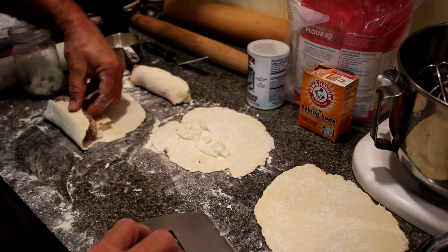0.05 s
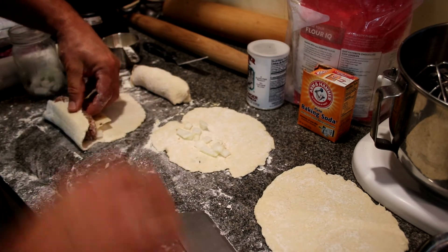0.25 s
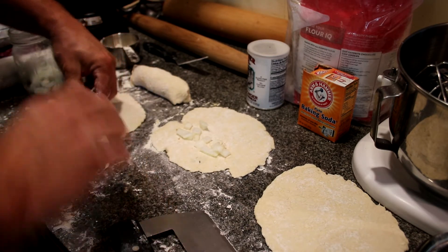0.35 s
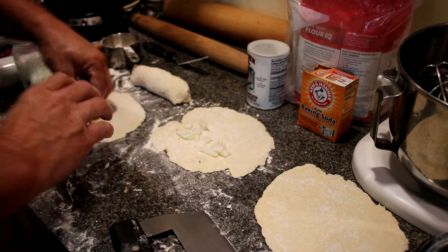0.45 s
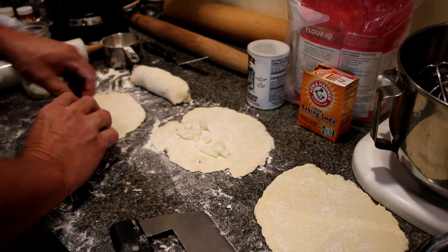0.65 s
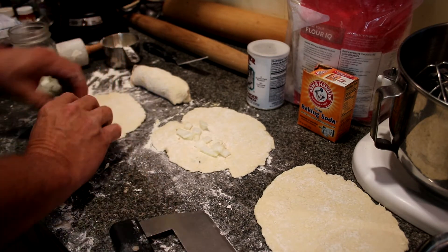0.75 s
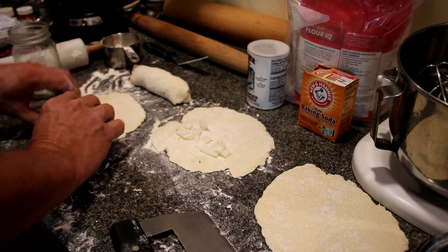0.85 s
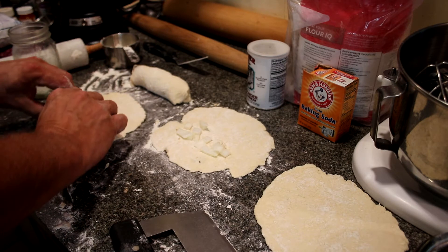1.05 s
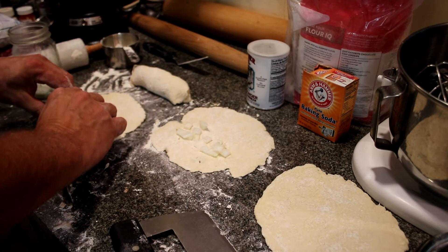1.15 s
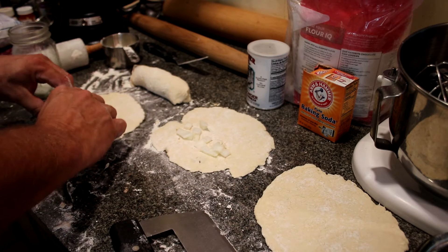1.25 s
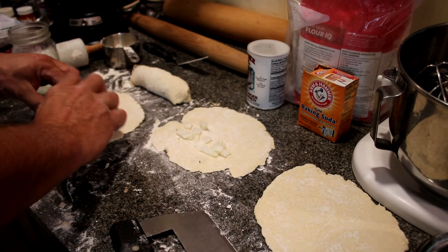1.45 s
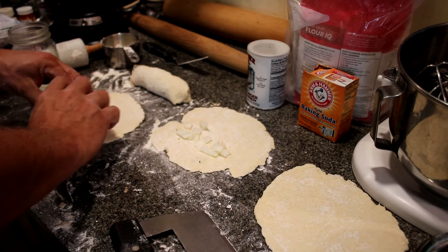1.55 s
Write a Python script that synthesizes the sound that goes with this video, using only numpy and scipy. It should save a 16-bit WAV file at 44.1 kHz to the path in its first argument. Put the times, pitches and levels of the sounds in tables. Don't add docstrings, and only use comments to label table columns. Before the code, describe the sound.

A steel dough scraper scrapes for an instant, clacks sharply onto a stone worktop and buzzes still; then faint sleeve hiss and soft floury finger brushes in a quiet, humming kitchen, close stereo microphone.

```python
import sys
import numpy as np
from scipy import signal
from scipy.fft import rfft, irfft
from scipy.io import wavfile
from scipy.ndimage import uniform_filter1d

SR = 44100
rng = np.random.default_rng(int(sys.argv[2]) if len(sys.argv) > 2 else 0)


def attenuation_scalar(level_db):
    decades = np.asarray(level_db, float) / 20
    return 10 ** decades


def generate_wav(sig):
    pcm = np.round(np.clip(np.atleast_2d(sig).T, -1, 1) * 32767).astype(np.int16)
    wavfile.write(sys.argv[1], SR, pcm)


N = 70560

# frequency in Hz, width in Hz, level in dB.
SLIDE_MODES = [(1050, 40, -8), (1285, 25, 0), (1800, 30, -5), (2260, 30, -8), (2755, 28, 0), (3190, 25, -1),
               (3400, 30, -4), (3670, 28, -6), (5610, 40, -12), (7000, 35, -5), (7600, 50, -10),
               (9090, 45, -7), (9990, 50, -10), (13200, 80, -10)]
# time in seconds, level in dB.
SLIDE_PRESSURE = [
    (0, -34),
    (.011, -31),
    (.035, -34),
    (.052, -29),
    (.064, -34),
    (.072, -38),
    (.09, -60),
]
# frequency in Hz, level in dB.
RASP_COLOUR = [(300, -34.5), (1200, -8.5), (3000, -6.5), (5000, -12.5), (7500, -8.5), (10500, -12),
               (14000, -15.5), (15800, -25.5)]
# start in seconds, level in dB, frequency in Hz.
TIPS = [
    (.0740, -20, 1150),
    (.0756, -18, 1100),
    (.0770, -10, 950),
    (.0794, -17, 1100),
]
# start in seconds, level in dB, push duration in ms.
HITS = [
    (.0804, -3.5, .12),
    (0.0814, -7.5, .04),
    (.0841, -4.5, .03),
    (0.085, -29.5, .05),
    (0.088, -21, 0.047),
    (0.098, -16.5, 0.095),
    (0.1044, -21.5, .25),
    (0.114, -36, 0.058),
]
# frequency in Hz, level in dB, T60 in seconds.
BLADE_MODES = [(1140, -13, .12), (1275, -15, .1), (1440, -16, .04), (1807, -12, .04), (2676, -7, .1),
               (3166, -7, .07), (3408, -3, .13), (3494, -5, .1), (4040, -7, .09), (7117, -9, .06),
               (8274, -10, .05), (8950, -7, .05), (9733, -5, .05), (10940, -9, .05)]
# frequency in Hz, level in dB, T60 in seconds.
SLAB_MODES = [(285, -1, .25), (600, -9, .03), (790, -7, .035), (1450, 15, .009), (1950, 2, .015)]
# frequency in Hz, level in dB.
CRACK_COLOUR = [(300, -23.5), (1300, -3.5), (2300, -10), (3500, -7.5), (5500, -10.5), (9300, -3.5),
                (13000, -12), (15800, -21.5)]
# frequency in Hz, level in dB.
CHATTER_COLOUR = [(180, -44.5), (300, -4), (553, -20), (1220, -2), (2490, -18.5), (3360, -4), (5160, -20.5),
                  (9990, -7.5), (15600, -25)]
# frequency in Hz, left minus right in dB.
SCRAPER_PAN = [(300, -0.5), (2500, -6.5), (8000, -3), (14000, -8)]
# centre in Hz, width in octaves, level in dB.
SLEEVE_BANDS = [(6500, 0.22, -55.5), (10000, 0.19, -73), (4280, 0.048, -63)]
# start in seconds, rise in seconds, fall T60 in seconds, level in dB, centre in Hz.
BRUSHES = [
    (0.489, .085, 0.197, -54, 5000),
    (.98, .03, 0.13, -67, 9000),
    (1.183, .003, 0.17, -54.5, 8200),
    (1.19, .03, .3, -58, 5400),
    (1.2855, 0.0017, .3, -47, 7460),
    (1.303, .025, 0.18, -45, 5000),
    (1.46, .035, .2, -56, 6500),
    (1.596, 0.0028, 0.1065, -43.5, 6000),
]
# frequency in Hz, level in dB.
AIR_COLOUR = [(30, -10), (300, -9), (850, -11), (2030, -18.5), (3800, -24), (5000, -31.5), (6800, -24.5),
              (15600, -27)]
# frequency in Hz, width in Hz, level in dB.
DRONE = [(52, 7, -73), (153.1, 21, -61), (262, 20, -67.5), (353.5, 15, -62), (466, 60, -61)]
# frequency in Hz, left-right correlation.
ALIKE = [(60, 0.74), (130, 0.79), (290, 0.74), (640, 0.54), (1410, 0.3), (3100, -0.65), (6820, -0.25),
         (15000, -0.044)]
# frequency in Hz, T60 in seconds, level in dB.
ROOM = [(300, 0.91, -18.5), (700, 0.9, -17), (1300, 0.88, -15.5), (2260, 0.57, -12), (3400, 0.33, -13.5),
        (5000, 0.51, -13), (8100, 0.84, -16), (14000, 0.63, -21)]

GRIT_PER_S, GRIT_SPREAD_DB, SLIDE_SHARPNESS = 6000, 1.5, 2.6
RASP_DB, LIFT_S = -4, .069
TIP_T60_S = .012
RING_DB, SLAB_DB, CRACK_DB, CRACK_T60_S = -14, -19, -1.5, .012
CHATTER_DB, CHATTER_GRAIN_DB, CHATTER_T60_S = -14, 2.5, .105
CHATTER_END_S, SETTLE_S = .13, .018
LAG_MS, THIN_HZ = 0.023, 258.2
SLEEVE_S, SLEEVE_RISE_S, SLEEVE_T60_S = 0.14, 0.22, 0.5
BRUSH_OCTAVES, BRUSH_TOP_HZ, BRUSH_GRAIN_DB = 0.96, 11070, 1.5
BRUSH_WET_DB, BRUSH_PAN_DB = -12.5, -4
DIP_HZ, DIP_DB = 5000, -3.5
CREAK_S, CREAK_LEN_S, CREAK_HZ, CREAK_DB = 0.81, 0.166, 1710, -67.5
AIR_DB, HUM_HZ, HUM_DB = -50.5, 59.3, -61
CEILING = 1.45

T = np.arange(N) / SR
F = np.maximum(np.fft.rfftfreq(2 * N, 1 / SR), 1)
Z = np.exp(-2j * np.pi * F / SR)


def table(rows, col=1):
    rows = np.array(rows, float)
    return np.interp(np.log(F), np.log(rows[:, 0]), rows[:, col])


def shape(x, gain):
    return irfft(rfft(x, 2 * N) * gain, 2 * N)[..., :N]


def unit(x):
    return x / np.sqrt(np.mean(x ** 2))


def ring(hz, t60):
    p = np.exp(2j * np.pi * hz / SR - np.log(1000) / (t60 * SR))
    return p.imag * Z / (1 - 2 * p.real * Z + abs(p) ** 2 * Z ** 2)


def hump(hz, octaves):
    return np.exp(-.5 * (np.log2(F / hz) / octaves) ** 2)


def walk(rate):
    k = max(int(SR / rate), 1)
    return unit(uniform_filter1d(uniform_filter1d(rng.standard_normal(N), k), k))


def decay(start, t60):
    return (T >= start) * attenuation_scalar(-60 * np.maximum(T - start, 0) / t60)


def stereo_noise(gain, least=0.):
    c = np.clip(np.maximum(table(ALIKE), least), 0, .99)
    mid = shape(rng.standard_normal(N), gain * np.sqrt(1 + c))
    side = shape(rng.standard_normal(N), gain * np.sqrt(1 - c))
    return unit(np.array([mid + side, mid - side]))


def slide():
    ticks = rng.random(2 * N) < GRIT_PER_S / SR
    grit = ticks * rng.standard_normal(2 * N) * attenuation_scalar(GRIT_SPREAD_DB * rng.exponential(size=2 * N))
    body = sum(attenuation_scalar(db) * ring(hz, SLIDE_SHARPNESS / width) * np.sqrt(width / 30)
               for hz, width, db in SLIDE_MODES)
    rasp = attenuation_scalar(RASP_DB) * unit(shape(grit, attenuation_scalar(table(RASP_COLOUR))))
    contact = np.clip((LIFT_S - T) / 0.0035 + 1, .15, 1)
    s, db = np.array(SLIDE_PRESSURE).T
    return (unit(shape(grit, body)) + rasp * contact) * attenuation_scalar(np.interp(T, s, db, right=-200))


def kitchen():
    air = 0
    for hz in 40 * 2. ** np.arange(9):
        gain = attenuation_scalar(table(AIR_COLOUR)) * hump(hz, 0.62)
        air = air + np.sqrt(np.mean(gain ** 2)) * stereo_noise(gain) * attenuation_scalar(1.0 * walk(5))
    drone = sum(attenuation_scalar(db) * stereo_noise(np.exp(-.5 * ((F - hz) / width) ** 2)) for hz, width, db in DRONE)
    return attenuation_scalar(AIR_DB - 3.0) * unit(air) + drone


def hum():
    return attenuation_scalar(HUM_DB + 2.0 * walk(17)) * np.sin(2 * np.pi * HUM_HZ * T)


def echo(x):
    tail = 0
    room_hz, room_t60, room_db = np.array(ROOM).T
    for hz in 150 * 2 ** np.arange(0, 6.8, 1 / 2):
        t60 = np.interp(np.log(hz), np.log(room_hz), room_t60)
        db = np.interp(np.log(hz), np.log(room_hz), room_db)
        gain = hump(hz, .25)
        level = np.sqrt(np.mean(gain ** 2) / (t60 * SR / 14))
        tail = tail + stereo_noise(gain) * level * decay(.006, t60) * attenuation_scalar(db)
    return shape(x, rfft(tail, 2 * N))


def clack():
    out = sum(attenuation_scalar(db) * decay(s, TIP_T60_S) * np.sin(2 * np.pi * hz * (T - s)) for s, db, hz in TIPS)
    noise = unit(shape(rng.standard_normal(N), attenuation_scalar(table(CRACK_COLOUR))))
    slab = sum(attenuation_scalar(SLAB_DB + db) * ring(hz, t60) for hz, db, t60 in SLAB_MODES)
    chance = rng.standard_normal((len(HITS), len(BLADE_MODES), 2))
    for (s, db, push_ms), draws in zip(HITS, chance):
        push = attenuation_scalar(db) * np.exp(-2j * np.pi * F * s) / (1 + 1j * F * push_ms / 1000)
        push = push / (1 + (F / 17000) ** 8)
        body = sum(np.sign(u) * attenuation_scalar(RING_DB + mode_db + 0.83 * v) * ring(hz * (1 + 0.0036 * v), t60)
                   for (hz, mode_db, t60), (u, v) in zip(BLADE_MODES, draws))
        if s == HITS[0][0]:
            body = body + slab
        crack = attenuation_scalar(db + CRACK_DB) * noise * decay(s, CRACK_T60_S)
        out = out + irfft(push * body, 2 * N)[:N] + crack
    return out * attenuation_scalar(-10 * np.clip((T - CHATTER_END_S) / SETTLE_S + 1, 0, 1))


def chatter():
    env = decay(HITS[1][0], CHATTER_T60_S) * np.clip((CHATTER_END_S - T) / SETTLE_S, 0, 1)
    level = attenuation_scalar(CHATTER_DB + CHATTER_GRAIN_DB * walk(500))
    return level * env * stereo_noise(attenuation_scalar(table(CHATTER_COLOUR)), 0.95)


def sleeve():
    fall = attenuation_scalar(-60 * np.maximum(T - SLEEVE_S - SLEEVE_RISE_S, 0) / SLEEVE_T60_S)
    env = np.clip((T - SLEEVE_S) / 0.017, 0, 1) * fall
    return env * sum(attenuation_scalar(db + 1.8 * walk(30)) * stereo_noise(hump(hz, octaves), 0.24)
                     for hz, octaves, db in SLEEVE_BANDS)


def fingers():
    out = 0
    dip = attenuation_scalar(DIP_DB * hump(DIP_HZ, 0.124))
    for s, rise, t60, db, hz in BRUSHES:
        env = np.clip((T - s) / rise, 0, 1) * attenuation_scalar(-60 * np.maximum(T - s - rise, 0) / t60)
        grain = rng.standard_normal(N) * attenuation_scalar(BRUSH_GRAIN_DB * walk(330))
        colour = hump(hz, BRUSH_OCTAVES) / (1 + (F / BRUSH_TOP_HZ) ** 6) * dip
        out = out + attenuation_scalar(db) * env * unit(shape(grain, colour))
    gate = uniform_filter1d(1. * ((T > CREAK_S) & (T < CREAK_S + CREAK_LEN_S)), 400)
    return out + attenuation_scalar(CREAK_DB) * gate * unit(shape(rng.standard_normal(N), hump(CREAK_HZ, 0.025)))


def scene():
    thin = (1j * F / THIN_HZ / (1 + 1j * F / THIN_HZ)) ** 2
    metal = shape(slide() + clack() + chatter(), thin)
    hands = fingers()
    side = np.array([[.5], [-.5]])
    lag = np.exp(-2j * np.pi * F * side * LAG_MS / 1000)
    near = shape(metal, attenuation_scalar(table(SCRAPER_PAN) * side) * lag) + hands * attenuation_scalar(BRUSH_PAN_DB * side)
    far = echo(metal[1] + attenuation_scalar(BRUSH_WET_DB + 22) * hands)
    return near + far + sleeve() + kitchen() + hum()


def low_pass(x):
    return signal.sosfilt(signal.butter(12, 15770, fs=SR, output="sos"), x)


def record(dry):
    mix = CEILING * np.tanh(dry / CEILING)
    return low_pass(mix)


dry = scene()
out = record(dry)
generate_wav(out)
```